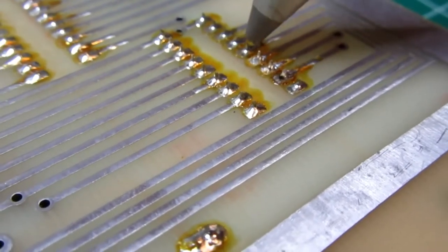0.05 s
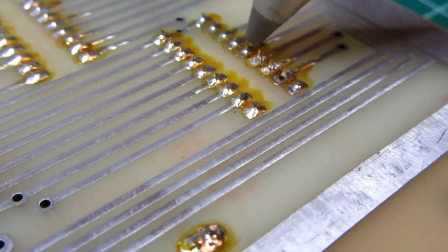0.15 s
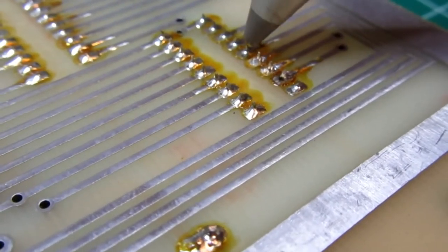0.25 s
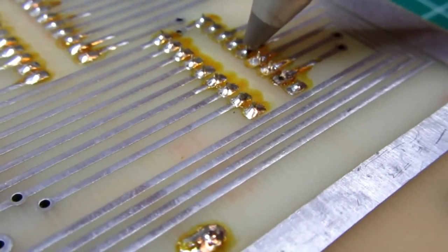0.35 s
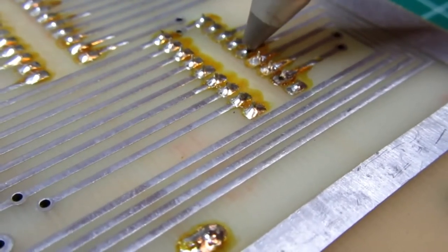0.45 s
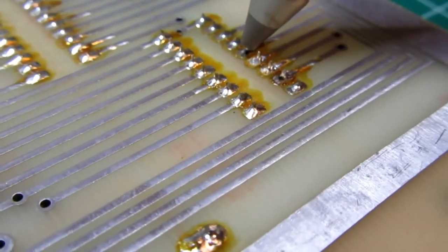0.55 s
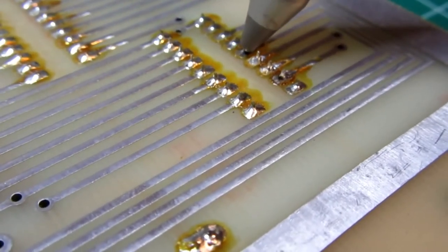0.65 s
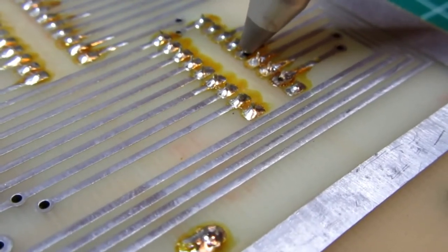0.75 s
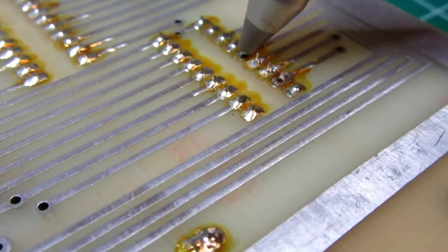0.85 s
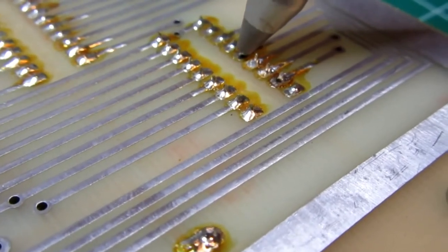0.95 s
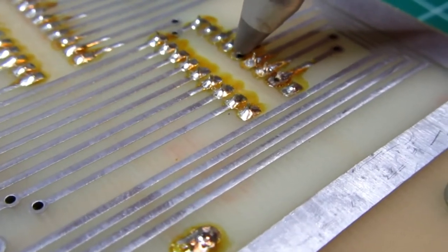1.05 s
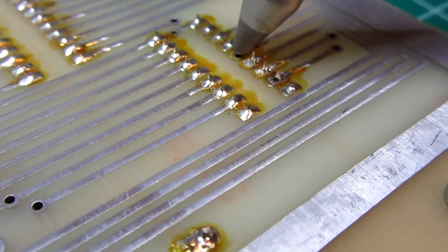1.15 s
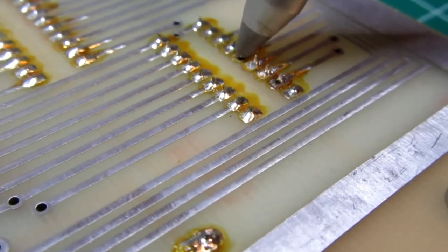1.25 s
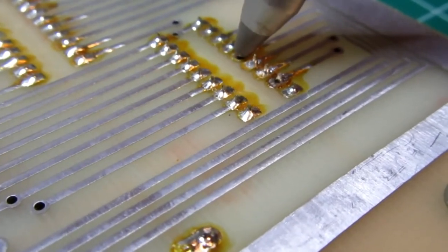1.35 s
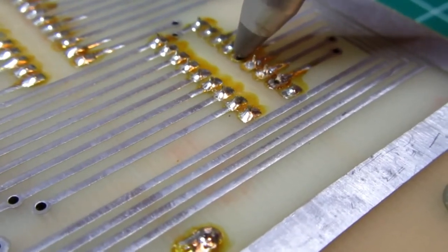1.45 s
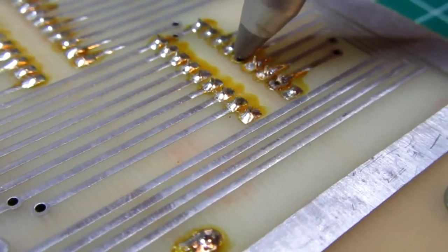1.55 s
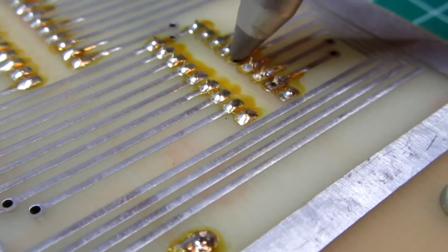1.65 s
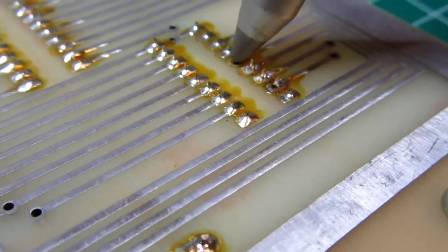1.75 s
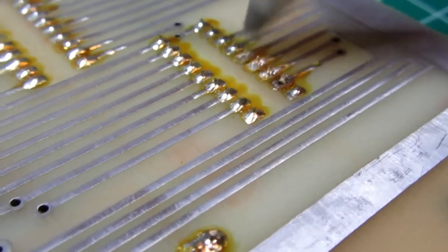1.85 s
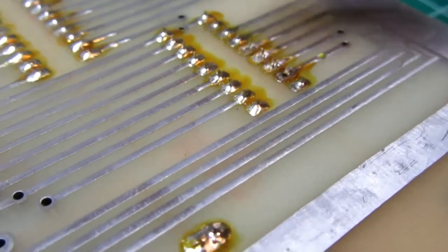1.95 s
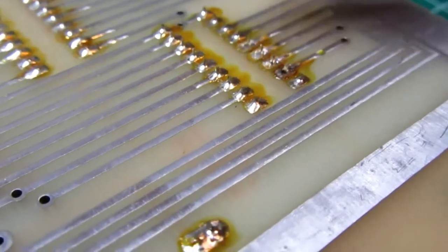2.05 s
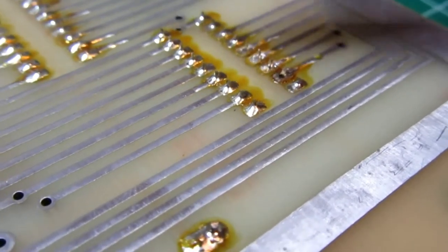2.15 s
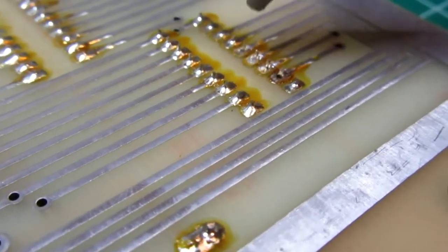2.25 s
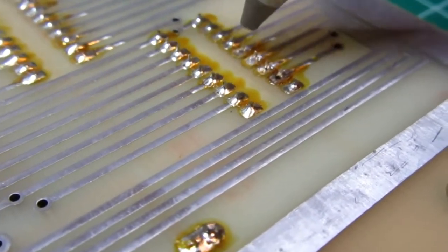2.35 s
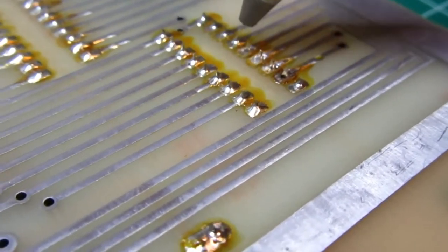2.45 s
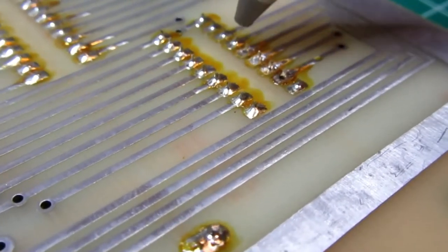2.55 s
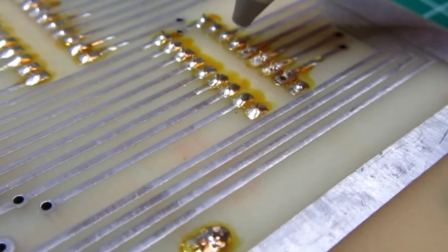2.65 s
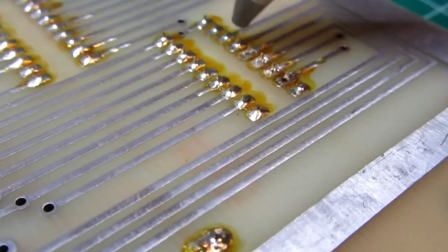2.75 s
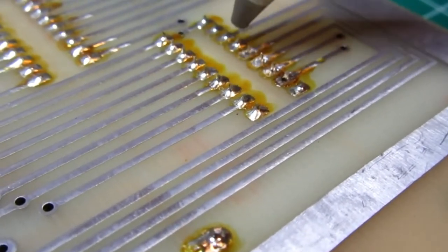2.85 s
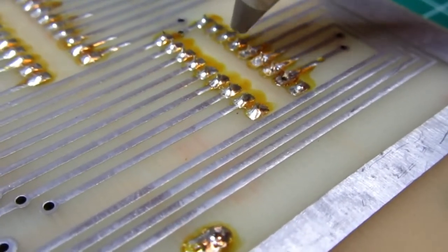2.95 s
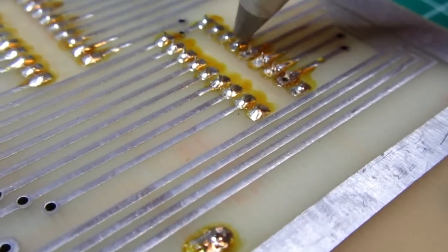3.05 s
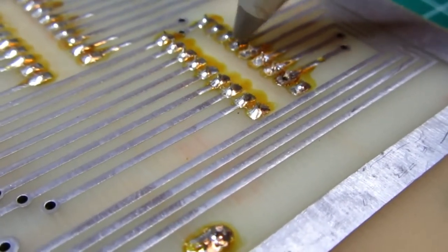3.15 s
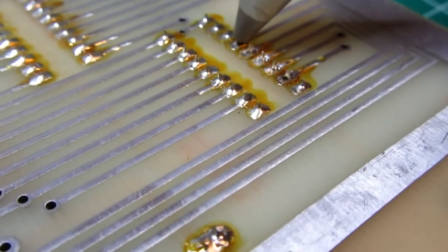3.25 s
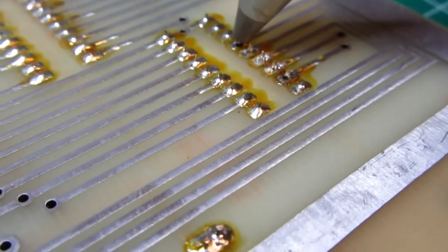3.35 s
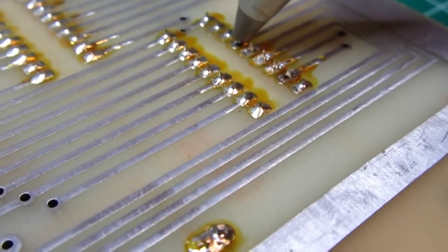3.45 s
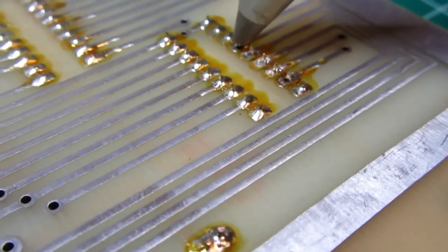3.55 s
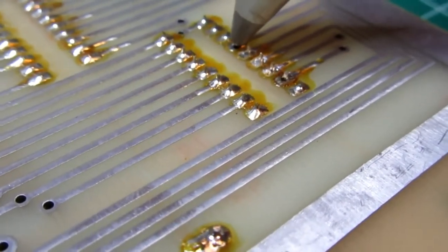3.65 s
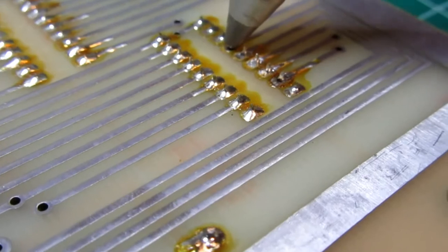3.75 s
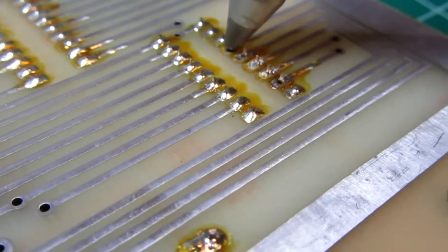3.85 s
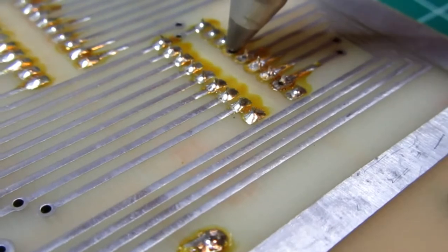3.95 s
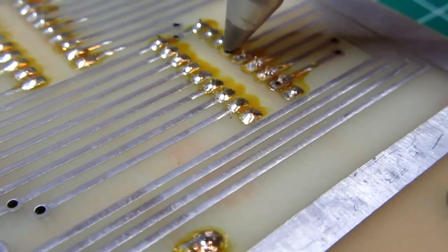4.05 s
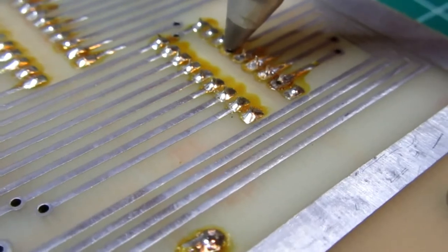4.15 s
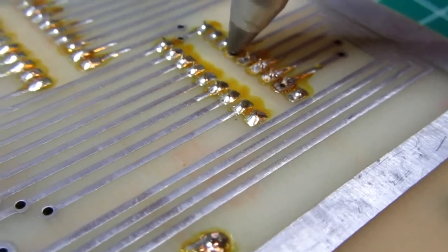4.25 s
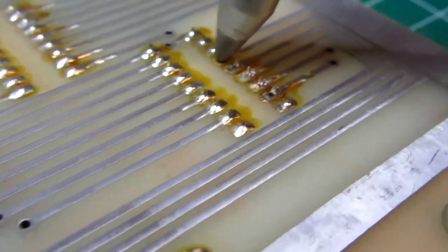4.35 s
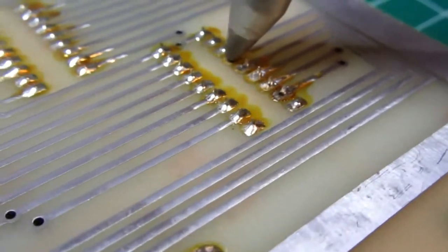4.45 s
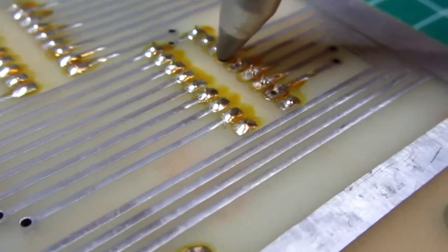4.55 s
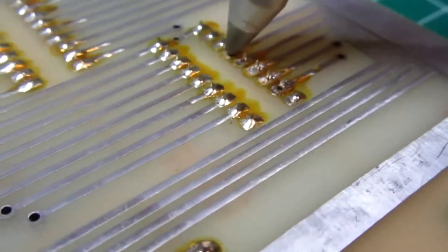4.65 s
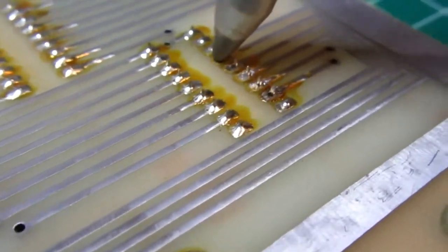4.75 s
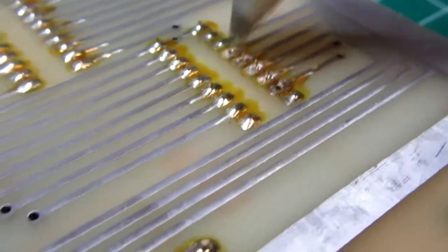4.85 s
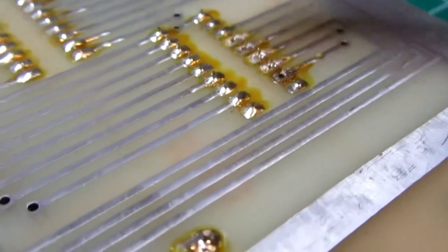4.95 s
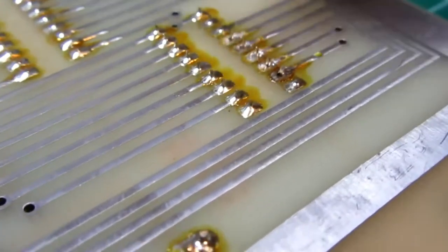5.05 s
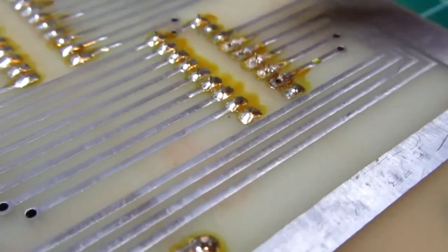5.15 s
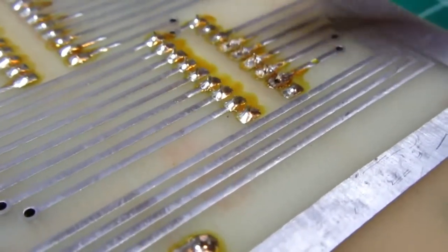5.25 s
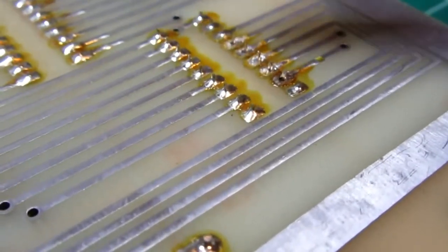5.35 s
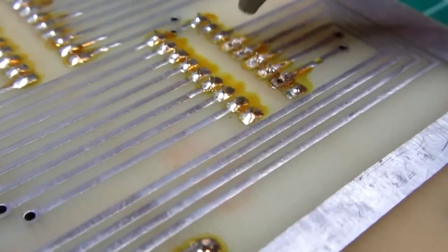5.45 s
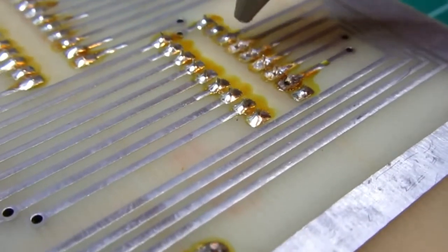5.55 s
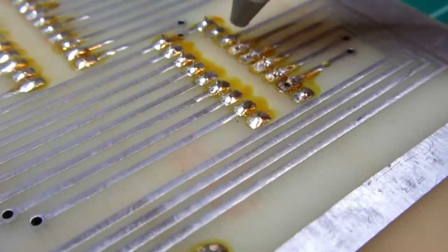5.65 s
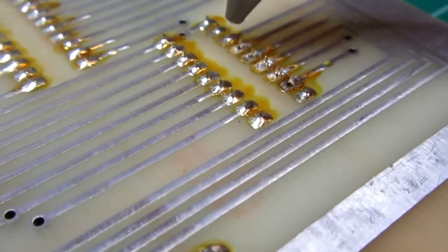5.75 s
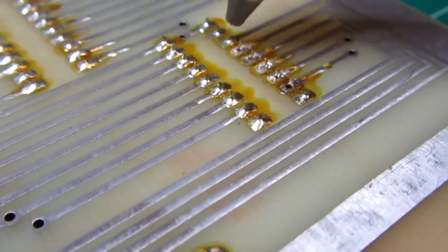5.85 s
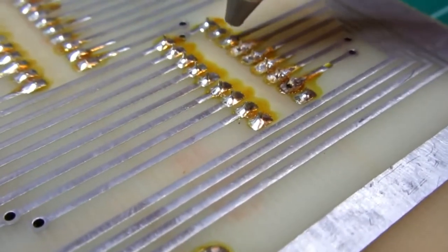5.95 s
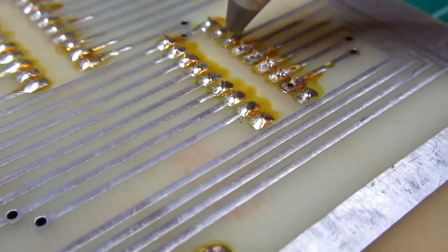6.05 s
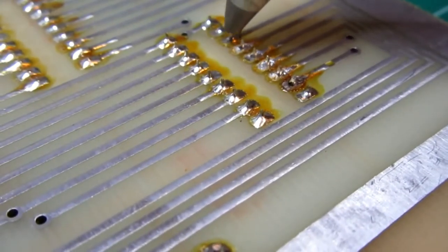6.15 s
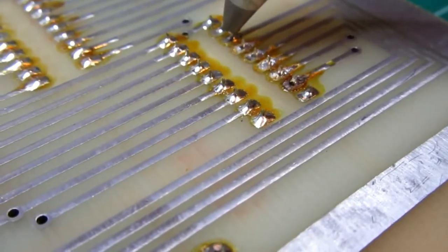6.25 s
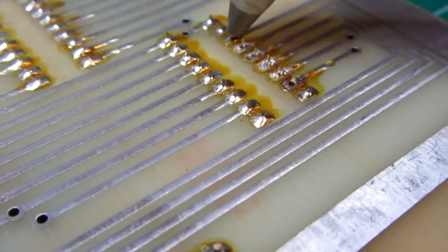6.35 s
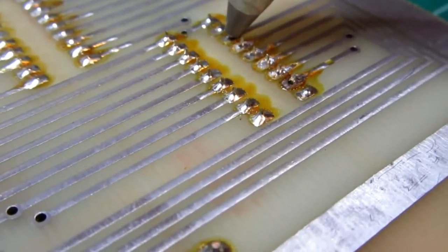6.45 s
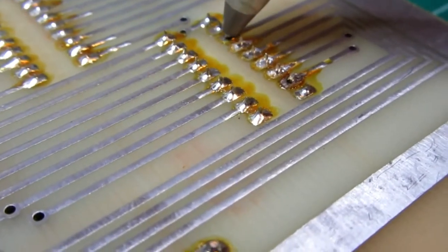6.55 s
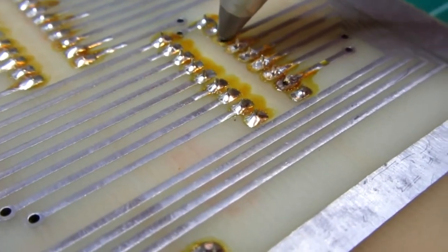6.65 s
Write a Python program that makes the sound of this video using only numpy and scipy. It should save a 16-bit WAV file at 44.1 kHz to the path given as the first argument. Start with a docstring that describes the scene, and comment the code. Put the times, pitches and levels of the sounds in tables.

```python
"""Hum, clatter and hiss in three bursts, with bright spits: a desoldering gun clears three solder joints.
The nozzle taps the board before the first two, the trigger clicks, and a small diaphragm pump spins up.
Shaft-locked sines make its hum and whine, a rattle repeated each turn and shaped noise its clatter and air.
Molten solder spits as short pressure swings; taps and clicks are damped modes driven by short noisy pushes.
After the first two runs the pump judders to a halt, the vacuum sighs away and thin metal rings on."""
import sys
import numpy as np
from scipy.fft import rfft, irfft, next_fast_len
from scipy.io import wavfile
from scipy.ndimage import map_coordinates

SR = 44100
rng = np.random.default_rng(int(sys.argv[2]) if len(sys.argv) > 2 else 0)


def wav_out(sig):
    """Save sig, one row per channel (or a flat mono array), as 16-bit PCM at SR to the path in sys.argv[1]."""
    wavfile.write(sys.argv[1], SR, np.round(np.clip(np.atleast_2d(sig).T, -1, 1) * 32767).astype(np.int16))


N = 295911
T = np.arange(N) / SR  # time in seconds

# Motor runs. Each row: switch-on in seconds, switch-off in seconds, full speed in turns per second.
MOTOR_RUNS = [(.745, 1.77, 78.6), (3.47, 4.82, 79.3), (6.058, 6.72, 79.3)]
# Air flow through the nozzle as the joint melts, clogs and opens, one curve per run.
# Each row of a curve: time in seconds, flow in dB.
AIR_FLOW = [
    [(0.82, -20), (0.87, -18), (0.94, -14.5), (1.01, -24.5), (1.1, -24), (1.14, -31.5), (1.32, -26.5),
     (1.55, -23.5), (1.75, -24)],
    [(3.54, -17), (3.61, -14), (3.72, -16), (3.81, -19.5), (3.87, -18), (3.92, -23), (4.08, -20.5),
     (4.2, -24), (4.42, -25), (4.5, -28), (4.79, -26)],
    [(6.12, -17.5), (6.18, -17.5), (6.24, -14.5), (6.3, -19.5), (6.42, -20), (6.56, -21.5), (6.63, -24.8),
     (6.7, -26.5)],
]
STEADY_FLOW_DB = -25  # flow of a settled run
SHUDDER_DELAY_S, SHUDDER_S = 0.025, 0.045  # the level swells or dips once after switch-off, then fades

# Low drone, one row per run: level in dB at spin-up, time in seconds when the vacuum starts to load it,
# build-up time in seconds, loaded level in dB.
DRONE_LOAD = [(-1, 1.03, 0.37, -36.5), (1.5, 3.78, 0.088, -33), (-0.5, 6.43, 0.061, -31)]
# Pump mount, swept by the low shaft orders. Each row: frequency in Hz, response in dB.
MOUNT_RESPONSE = [(105, -41.5), (132, -29), (143, -47.5), (149, -41.5), (158, -39.5), (182, -34.5),
                  (214, -26), (224, -30.5), (231, -43)]
# Weaker shaft orders of the hum. Each row: multiple of shaft speed, level in dB before the panel lifts it.
HUM_OVERTONES = [(1, -38.5), (5, -23), (6, -20.5)]
# Broad tone of the pump housing. Each row: frequency in Hz, level in dB.
HOUSING_SLOPE = [(40, -35.5), (110, -25.5), (170, -22.5), (210, -6.5), (280, -16.5), (470, -14),
                 (580, -10.5), (700, -2), (950, -0.5), (1170, -10.5), (2300, -14), (3000, -23.5),
                 (6000, -26.5), (15000, -43.5)]
# Resonances of the pump housing. Each row: frequency in Hz, width in Hz, lift in dB.
HOUSING_PEAKS = [(352, 83, 15.5), (440, 15, -8.5), (666, 20, 7), (870, 91, 11), (1077, 40, 5.5),
                 (1444, 210, 8.5), (1730, 25, -4.5), (1975, 140, 5), (2332, 110, 7)]
# Motor whine. Each row: multiple of shaft speed, level in dB against the clatter.
WHINE_ORDERS = [(8, -22), (9, -17), (14, -21), (22, -19.5), (23, -22.5), (25, -21.5), (28, -21.5),
                (49, -22.5)]
# Jerk of the motor at each start: drive in dB, one per run; the envelope peaks at half of it.
KICK_DRIVE_DB = [-30, -22, -28]

# Broad tone of the air path. Each row: frequency in Hz, level in dB.
AIR_SLOPE = [(100, -34), (450, -19), (900, -6.5), (2000, 1.5), (3300, 1.5), (5000, -2), (7300, -5),
             (9500, -5), (12500, -9.5), (15000, -10)]
# Resonances of the air tube. Each row: frequency in Hz, width in Hz, lift in dB.
TUBE_PEAKS = [(3830, 225, 5.1), (6085, 130, 8.6), (8330, 120, 12.2), (11580, 190, 5), (11880, 30, 7.6)]
# Echoes of the air off board, bench and tool. Each row: delay in seconds, level in dB.
NEAR_ECHOES = [(.0026, -18.5), (.0071, -11), (0.0135, -14.5), (0.018, -14)]
# Hiss swells just before a loud spit or as the pump stops. Each row: peak in seconds, extra hiss in dB.
HISS_SURGES = [(.995, 11), (1.118, 1.5), (1.799, 5), (3.892, 4), (4.475, 1.5), (4.83, 5), (6.6, 5.5)]
SURGE_S = 0.03  # time constant of that build-up

# Single spits of solder in the nozzle. Each row: time in seconds, peak of the swing in dB, pitch in Hz.
SINGLE_SPITS = [(0.9648, -5, 3740), (0.9837, -6, 5860), (0.9924, -1.5, 3800), (1.1165, 0, 5240),
                (1.1789, -11.5, 3850), (1.3486, -9.5, 3880), (1.4414, -14, 5400), (1.4859, -9, 4060),
                (1.5484, -8, 3940), (1.6891, -6.5, 4130), (1.7731, -7, 3980), (3.695, -7, 3860),
                (3.8895, 5, 5290), (4.0446, -8.5, 4448), (4.092, -7.5, 3900), (4.1315, -1.5, 4600),
                (4.1898, 1, 5900), (4.2413, -7, 4070), (4.3231, -9.5, 4000), (4.462, -3, 4600),
                (4.4724, -7.5, 4510), (6.5107, -3, 3750), (6.5949, 8.5, 5300)]
# The joint has opened and the last solder sizzles.
# Each row: start in seconds, end in seconds, lesser spits per second.
SIZZLE_SPANS = [(.95, 1.82, 15), (3.85, 4.86, 12), (6.48, 6.62, 14)]
SPIT_HZ, SPIT_SCATTER = 5800, .2  # middle pitch of the lesser spits and its relative spread

# Pump stops. Each row: switch-off in seconds, judder level in dB, sigh level in dB at release,
# time in seconds when the vacuum is gone.
PUMP_STOPS = [(1.763, -35, -24.5, 1.96), (4.818, -36.5, -28.5, 4.997)]
# Tone of the judder. Each row: frequency in Hz, level in dB.
JUDDER_SLOPE = [(40, -37), (115, 3), (210, 10), (400, 18), (800, -49), (2000, -73.5)]
# Tone of the vacuum's sigh. Each row: frequency in Hz, level in dB.
SIGH_SLOPE = [(88, -38), (150, -4), (535, -5), (612, -12), (883, -5.5), (1030, -6), (1130, -11.5),
              (1770, -12), (3670, -8.5), (6060, -11), (6810, -39.5), (10800, -19), (15000, -25)]
# Thin metal in the gun. Each row: frequency in Hz, time in seconds to fall 60 dB, then the level in dB
# at the first and at the second stop, before the fade-in.
METAL_MODES = [(395, 0.78, -51, -44), (690, 0.78, -54, -47), (860, 0.7, -50, -45), (1167, 0.68, -30, -39.5),
               (1700, 0.64, -44, -44), (1887, 2.2, -52, -65), (1998, 12, -64, -57), (4125, 2.6, -74, -66),
               (5720, 0.8, -56, -58), (6480, 0.87, -62, -61), (12190, 1.4, -60, -67)]

# Trigger clicks. Each row: time in seconds, level in dB before the 1.5 dB lift in the mix.
TRIGGER_CLICKS = [(.7277, -17.5), (3.4539, -9.5), (3.457, -24), (6.0347, -13.5), (6.0402, -27.5)]
# Modes of the switch. Each row: frequency in Hz, width in Hz, level in dB.
SWITCH_MODES = [(1000, 320, -8), (1840, 423, -4), (3325, 600, 1.5), (3680, 410, -3), (4830, 510, -3),
                (6400, 2000, -12.5), (9100, 1300, -5.5), (12800, 840, -35)]
# Nozzle touches the board. Each row: time in seconds, peak in dB.
BOARD_TAPS = [(.568, -27.5), (.62, -24.5), (.686, -33), (3.1273, -15), (3.2, -34.5), (3.247, -34),
              (3.335, -38.5)]
# Modes of the circuit board. Each row: frequency in Hz, width in Hz, level in dB.
BOARD_MODES = [(252, 200, -7.5), (860, 310, 2.5), (1230, 370, 6), (1455, 99, 10.5), (1896, 430, 3),
               (2480, 470, 2), (3120, 300, 2.5), (3620, 170, -10), (9130, 2300, -15)]

# Faint wavering tone. Each row: time in seconds, frequency in Hz, level in dB.
WAVERING_TONE = [(5.2, 460, -81), (5.27, 469, -63), (5.34, 512, -67.5), (5.39, 546, -72), (5.45, 518, -66),
                 (5.56, 485, -62), (5.62, 480, -93)]
# Loudness of the workshop. Each row: time in seconds, level in dB.
WORKSHOP_LEVEL = [(0, -60.5), (.5, -56.5), (2.2, -58.5), (3.1, -53.5), (3.4, -52), (5.2, -60), (6.7, -54)]
# Broad tone of the workshop. Each row: frequency in Hz, level in dB.
WORKSHOP_SLOPE = [(15, -51), (25, -17.5), (59, -5), (95, -9), (121, 2.5), (186, -0.5), (271, -4.5),
                  (354, -8.5), (383, -13), (1210, -14.5), (1760, -23), (2070, -18), (2240, -24),
                  (9270, -29), (15000, -42)]
# Resonances of the workshop. Each row: frequency in Hz, width in Hz, lift in dB.
WORKSHOP_PEAKS = [(1280, 110, 8), (135, 40, -2)]
# Steady workshop tones. Each row: frequency in Hz, level in dB.
WORKSHOP_TONES = [(360.7, -70), (5529, -84.5), (8979, -87)]
TOP_HZ = 15100  # upper band limit of the whole mix


def amp(db):
    """Decibels to gain."""
    return 10 ** (np.asarray(db) / 20)


def unit(x):
    """Scale to rms 1."""
    return x / np.sqrt(np.mean(x ** 2) + 1e-20)


def noise():
    """Fresh white noise."""
    return rng.standard_normal(N)


def wobble(rate):
    """A smooth random curve through rate random knots a second."""
    knots = rng.standard_normal(int(N * rate / SR) + 4)
    return map_coordinates(knots, [T * rate])


def curve(points):
    """Join (time, value) points by straight lines."""
    return np.interp(T, *np.transpose(points))


def filtered(x, response):
    """Shape x by a response given as a function of frequency in Hz."""
    size = next_fast_len(len(x) + 8192)
    spectrum = rfft(x, size) * response(np.fft.rfftfreq(size, 1 / SR))
    return irfft(spectrum, size)[:len(x)]


def coloured(x, slope, peaks=()):
    """Shape x by a broad slope with resonant peaks on it, at rms 1."""
    slope_hz, slope_db = np.transpose(slope)

    def response(hz):
        db = np.interp(np.log(hz + 1), np.log(slope_hz), slope_db)
        for centre, width, lift_db in peaks:
            db = db + lift_db / (1 + (2 * (hz - centre) / width) ** 2)
        return amp(db)

    return unit(filtered(x, response))


def struck(force, modes):
    """A force rings a set of damped modes; peak 1."""
    def response(hz):
        return sum(amp(db) * 1j * hz * width / (centre * centre - hz * hz + 1j * hz * width)
                   for centre, width, db in modes)

    ring = filtered(force, response)
    return ring / np.abs(ring).max()


def add(track, s, sound):
    """Mix a sound into the track at time s."""
    part = track[max(0, round(s * SR)):][:len(sound)]
    part += sound[:len(part)]


def shaft_turns():
    """The motor spins up fast, creeps to full speed, and coasts down against the vacuum once switched off."""
    speed = np.zeros(N)
    for on, off, full in MOTOR_RUNS:
        age = np.maximum(T - on, 0)
        run = full - 18 * np.exp(-age / .07) - 8.5 * np.exp(-age / .22)
        coast = np.exp(-np.maximum(T - off, 0) / .13)
        speed = np.where(T > on - .05, run * coast, speed)
    unsteady = 1 + .0015 * wobble(8)
    return np.cumsum(speed * unsteady) / SR


def level(steady_db, follow, attack, shudder_db, fall_db_per_s):
    """A layer's gain rises at switch-on, follows the air flow (dB per dB), shudders at switch-off and fades."""
    gain = np.zeros(N)
    for (on, off, _), flow in zip(MOTOR_RUNS, AIR_FLOW):
        age = np.maximum(T - on, 0)
        late = T - off - SHUDDER_DELAY_S
        db = steady_db + follow * (curve(flow) - STEADY_FLOW_DB)
        db += shudder_db * np.exp(-(late / SHUDDER_S) ** 2)
        db -= fall_db_per_s * np.maximum(late, 0)
        rise = 1 - np.exp(-(age / attack) ** 1.38)
        gain += rise * amp(db)
    return gain


def effort():
    """Gain of the mechanism's rattle, which follows the air flow closely."""
    return level(steady_db=-24.5, follow=0.98, attack=0.065, shudder_db=3, fall_db_per_s=242)


def stroke(turns, phase, depth_db):
    """A swell once a turn, at rms 1."""
    return unit(amp(depth_db * np.cos(2 * np.pi * (turns - phase))))


def drone_gains():
    """Per run: the strength of the spin-up drone, and the drone that grows with the vacuum."""
    spin_up, loaded = np.zeros(N), np.zeros(N)
    for (on, _, _), (spin_up_db, start, build, loaded_db) in zip(MOTOR_RUNS, DRONE_LOAD):
        started = T > on
        growth = 1 - np.exp(-np.maximum(T - start, 0) / build)
        spin_up[started] = amp(spin_up_db)
        loaded[started] = (amp(loaded_db) * growth)[started]
    return spin_up, loaded


def hum(turns, panel_hz=376, panel_width_hz=14, panel_db=9, fourth_db=-8):
    """The diaphragm's low orders bloom as they sweep mount and panel resonances, and swell under load."""
    speed = np.gradient(turns) * SR
    spin_up, loaded = drone_gains()

    def order(k):
        return np.sqrt(2) * np.sin(2 * np.pi * (k * turns + rng.random()))

    def mount(k):
        return spin_up * amp(np.interp(k * speed, *np.transpose(MOUNT_RESPONSE)))

    overtones = np.zeros(N)
    for k, db in HUM_OVERTONES:
        bloom_db = panel_db / (1 + ((k * speed - panel_hz) / panel_width_hz) ** 2)
        overtones += amp(db + bloom_db + wobble(9)) * order(k)
    third_and_fourth = order(3) + amp(fourth_db) * order(4)
    drone = mount(2) * order(2) + (mount(3) + loaded) * third_and_fourth
    drone_level = level(steady_db=0, follow=0.55, attack=0.048, shudder_db=-5, fall_db_per_s=550)
    return drone_level * drone + effort() * overtones


def knocking(turns, slip, count, size=4096):
    """The same rattle of valves and linkage comes back every turn, up to slight slips early or late."""
    audible = np.arange(count) > 6  # shaft harmonics from the seventh up
    one_turn = irfft(audible * np.exp(2j * np.pi * rng.random(count)), size)
    return np.interp(turns + slip * wobble(70), np.arange(size) / size, one_turn, period=1)


def clatter(turns, regular_db=-5.5, loose_db=-3):
    """Repeating knocks and loose puffs of exhaust ring the pump housing."""
    knocks = knocking(turns, slip=.002, count=90)
    puffs = noise() * stroke(turns, phase=0.59, depth_db=2)
    regular = coloured(knocks, HOUSING_SLOPE, HOUSING_PEAKS)
    loose = coloured(puffs, HOUSING_SLOPE, HOUSING_PEAKS)
    unsteady = amp(0.55 * wobble(30))
    return effort() * unsteady * (amp(regular_db) * regular + amp(loose_db) * loose)


def whine(turns):
    """Thin, slightly unsteady lines of the motor on high shaft orders."""
    lines = np.zeros(N)
    for k, db in WHINE_ORDERS:
        phase = 2 * np.pi * k * turns + .3 * wobble(20)
        lines += amp(db + 2.5 * wobble(12)) * np.sin(phase)
    return effort() * lines


def nearby(x):
    """Weak echoes from close surfaces ripple the spectrum."""
    out = x.copy()
    for delay, db in NEAR_ECHOES:
        add(out, delay, amp(db) * x)
    return out


def air(turns):
    """Air is drawn through the nozzle in gulps, one each turn; its hiss surges at listed moments."""
    gulps = stroke(turns, phase=0.31, depth_db=1.5) * amp(2.7 * wobble(350))
    surge_db = np.zeros(N)
    for s, db in HISS_SURGES:
        surge_db += db * np.exp(-np.abs(s - T) / SURGE_S) * (T < s)
    hiss = unit(nearby(coloured(noise() * gulps, AIR_SLOPE, TUBE_PEAKS)))
    gain = level(steady_db=-33, follow=0.74, attack=0.033, shudder_db=3, fall_db_per_s=181)
    return gain * amp(surge_db) * hiss


def spit(hz, cycles=0.19, spray=0.13, spray_life=0.00094, push=0.006):
    """A droplet bursts: one sharp pressure swing, a small low push and a trace of spray."""
    t = np.arange(-SR // 2000, SR // 200) / SR  # the swing is centred on t = 0
    swing = -np.sin(2 * np.pi * hz * t) * np.exp(-np.abs(t) * hz / cycles)
    after = (t > 0) * np.exp(-np.abs(t) / spray_life)
    return swing / np.abs(swing).max() + after * (spray * rng.standard_normal(len(t)) - push)


def solder(rate=120, small_db=-24.5, spread_db=1.5, lesser_db=-10.5, lesser_spread_db=2, burst_s=.0009):
    """Molten solder bursts in single spits and lesser ones at random, above a fine sizzle."""
    out = np.zeros(N)
    for s, db, hz in SINGLE_SPITS:
        add(out, s + burst_s, amp(db) * spit(hz))
    for start, end, lesser_per_s in SIZZLE_SPANS:
        span = end - start
        # fine sizzle, rate droplets a second
        for when, size, pitch in rng.random((int(rate * span), 3)):
            db = small_db - spread_db * np.log(size + .03)
            add(out, start + when * span, amp(db) * spit(3500 * 2.4 ** pitch))
        for when, size in rng.random((round(lesser_per_s * span), 2)):
            hz = SPIT_HZ * np.exp(SPIT_SCATTER * rng.standard_normal())
            db = lesser_db + lesser_spread_db * (2 * size - 0.5)
            add(out, start + when * span, amp(db) * spit(hz))
    return out


def kicks(kick_hz=310, life=0.0081):
    """The motor jerks in its mount as the current comes on: a brief low thump."""
    out, t = np.zeros(N), np.arange(SR // 10) / SR
    envelope = t / life * np.exp(1 - t / life) * np.exp(-t / life)
    for (on, _, _), db in zip(MOTOR_RUNS, KICK_DRIVE_DB):
        add(out, on, amp(db) * np.sin(2 * np.pi * kick_hz * t) * envelope)
    return out


def release(flutter_db=3.0, squeak_db=-43):
    """The pump judders to a halt and air leaks back unevenly, ending in a falling squeak."""
    out = np.zeros(N)
    for s, judder_db, sigh_db, end in PUMP_STOPS:
        age, left = np.maximum(T - s, 0), end - T
        bump = np.exp(-((T - s - .025) / 0.025) ** 2)
        out += amp(judder_db) * bump * coloured(noise(), JUDDER_SLOPE)

        gate = np.clip(age / .05, 0, 1) * np.clip(left / .03, 0, 1)
        leak = amp(sigh_db - 107 * age + flutter_db * wobble(70))  # falls 107 dB a second
        out += leak * gate * coloured(noise(), SIGH_SLOPE)

        squeak_hz = 3650 + 30000 * np.clip(left, -.03, .03) + 300 * wobble(1500)
        # swells up to the end of the vacuum, then cuts off fast
        swell = np.exp(-np.maximum(left / .02, (left / .007) ** 2 * (left < 0)))
        out += amp(squeak_db) * swell * np.sin(2 * np.pi * np.cumsum(squeak_hz) / SR)
    return out


def metal(waver_db=0.2):
    """Thin metal, shaken by the halting pump, rings on as slowly fading sines."""
    out = np.zeros(N)
    for hz, t60, *levels in METAL_MODES:
        ring = np.zeros(N)
        for (s, *_), db in zip(PUMP_STOPS, levels):
            fade_in = np.clip((T - s) / 0.24, 0, 1)
            ring += amp(db - 60 * np.maximum(T - s, 0) / t60) * fade_in
        out += ring * amp(waver_db * wobble(19)) * np.sin(2 * np.pi * hz * T)
    return out


def contacts(events, modes, scrape, tail_db, tail, soft_hz, snap):
    """Each contact pushes roughly into the modes, with an optional snap and a faint lingering rattle."""
    out, t = np.zeros(N), np.arange(SR // 5) / SR
    for s, db in events:
        force = rng.standard_normal(len(t)) * (np.exp(-t / scrape) + amp(tail_db) * np.exp(-t / tail))
        force[0] += snap
        force = filtered(force, lambda hz: 1 / (1 + 1j * hz / soft_hz) ** 2)  # softer contact, less treble
        add(out, s, amp(db) * struck(force, modes))
    return out


def trigger():
    """The switch contacts scrape briefly and ring their own modes."""
    clicks = contacts(TRIGGER_CLICKS, SWITCH_MODES, scrape=0.0021, tail_db=-19, tail=0.02,
                      soft_hz=20000, snap=0)
    return amp(1.5) * clicks


def taps():
    """The nozzle snaps and scrapes against the circuit board, which rings."""
    return contacts(BOARD_TAPS, BOARD_MODES, scrape=0.0037, tail_db=-15.5, tail=0.029,
                    soft_hz=3520, snap=6.2)


def faint_tone():
    """A faint sine wavers in the second pause."""
    s, hz, db = np.transpose(WAVERING_TONE)
    gain = amp(np.interp(T, s, db)) * (T > s[0]) * (T < s[-1])
    pitch = np.interp(T, s, hz) + 6 * wobble(40)
    return gain * np.sin(2 * np.pi * np.cumsum(pitch) / SR)


def workshop():
    """Quiet room air, made of shaped noise, with a few faint steady tones."""
    out = amp(curve(WORKSHOP_LEVEL)) * coloured(noise(), WORKSHOP_SLOPE, WORKSHOP_PEAKS)
    for hz, db in WORKSHOP_TONES:
        out += amp(db) * np.sqrt(2) * np.sin(2 * np.pi * hz * T)
    return out


def scene():
    """Pump, nozzle and board close by, over the workshop, in one channel."""
    turns = shaft_turns()
    pump = hum(turns) + clatter(turns) + whine(turns) + kicks()
    nozzle = air(turns) + solder()
    stopping = release() + metal()
    handling = trigger() + taps()
    return (pump + nozzle + stopping + handling + faint_tone() + workshop())[None]


def record(dry):
    """Peaks flatten at 0.88 of full scale, then the treble ends steeply at the band limit."""
    clipped = np.clip(dry[0], -.88, .88)
    return filtered(clipped, lambda hz: 1 / np.sqrt(1 + (hz / TOP_HZ) ** 200))[None]


dry = scene()
out = record(dry)
wav_out(out)
```